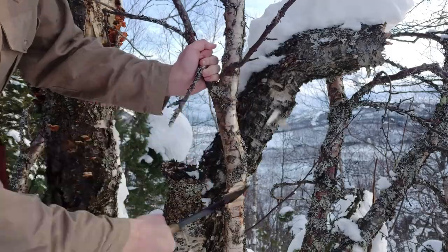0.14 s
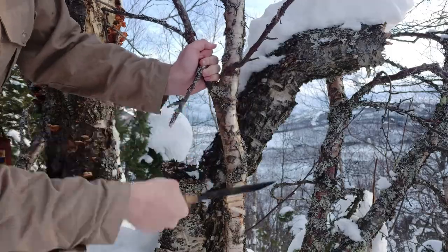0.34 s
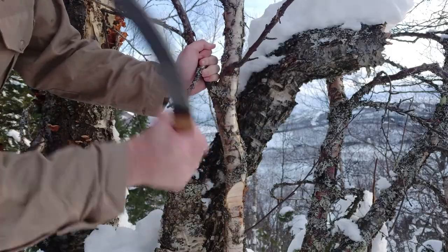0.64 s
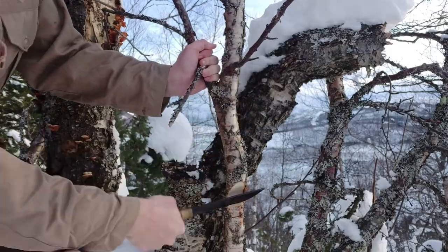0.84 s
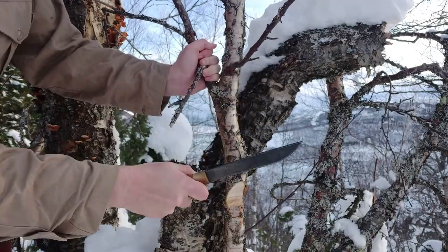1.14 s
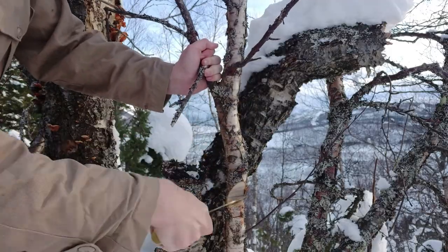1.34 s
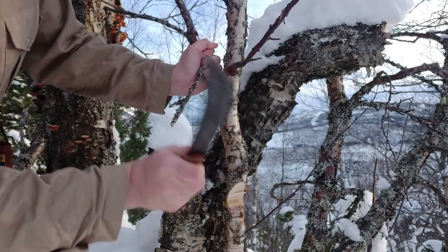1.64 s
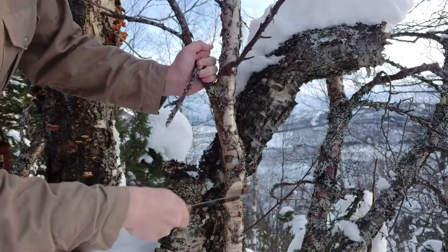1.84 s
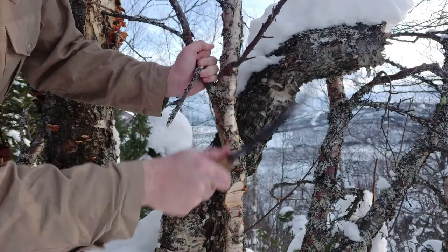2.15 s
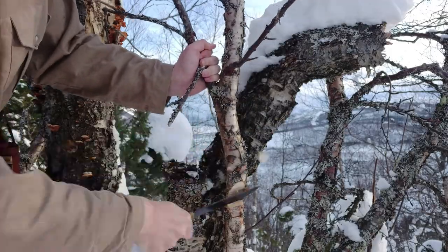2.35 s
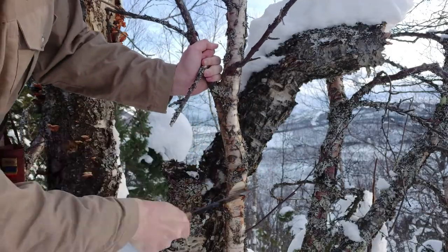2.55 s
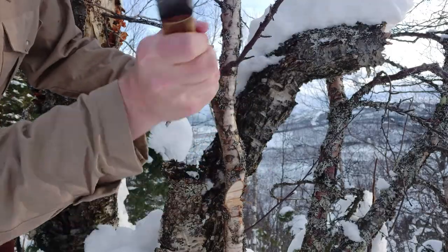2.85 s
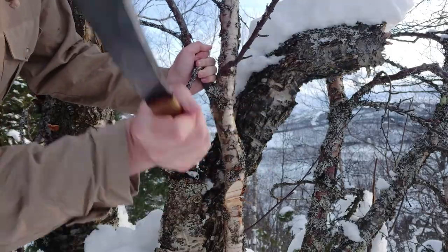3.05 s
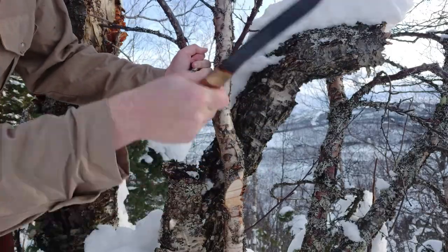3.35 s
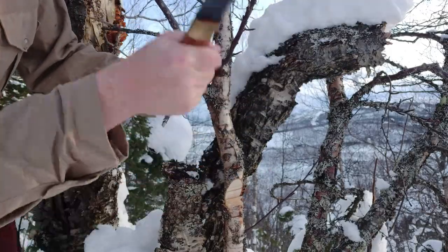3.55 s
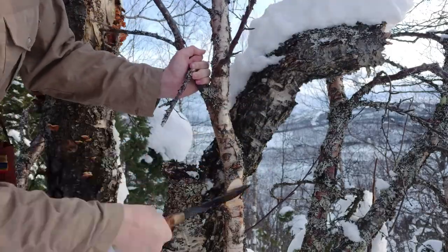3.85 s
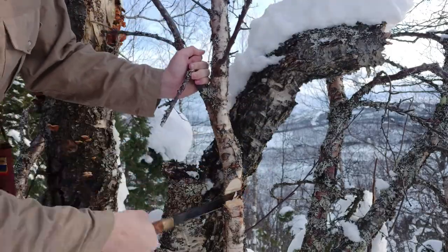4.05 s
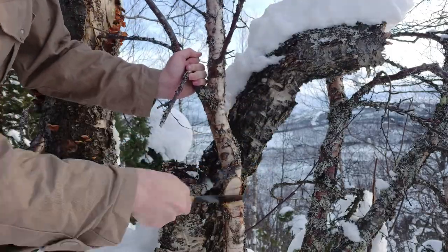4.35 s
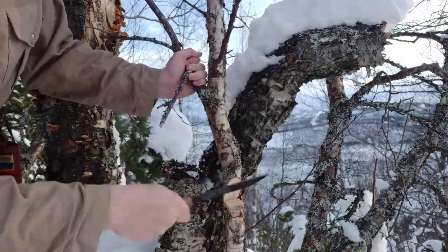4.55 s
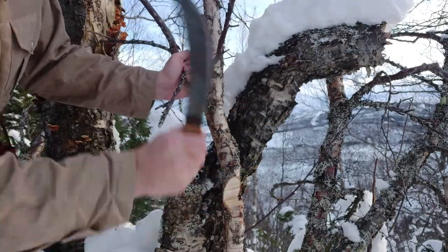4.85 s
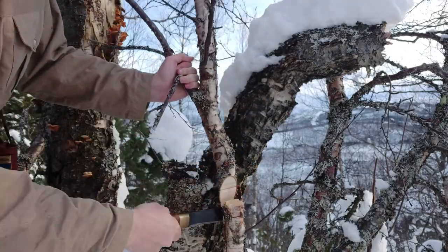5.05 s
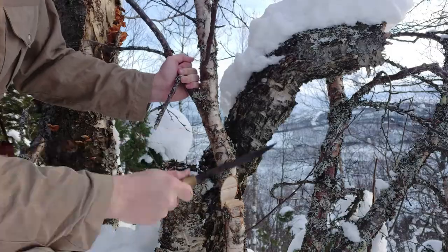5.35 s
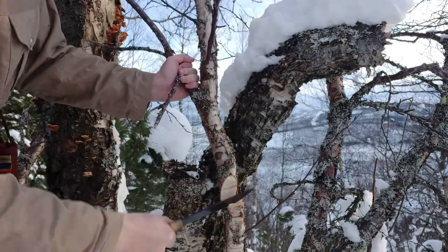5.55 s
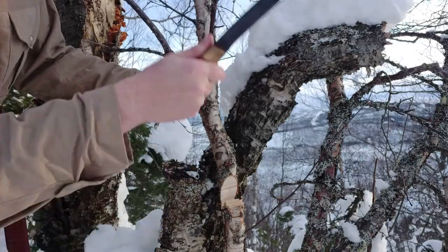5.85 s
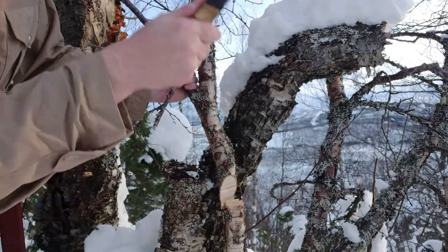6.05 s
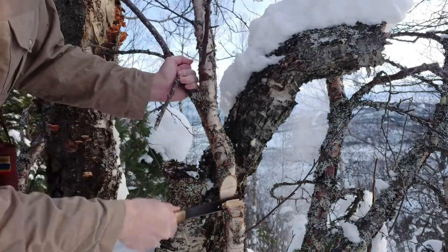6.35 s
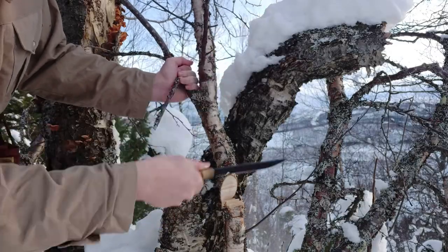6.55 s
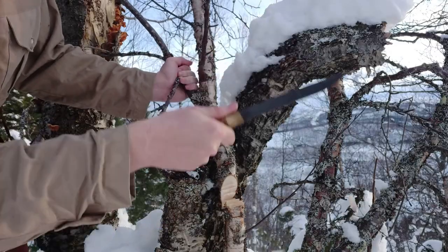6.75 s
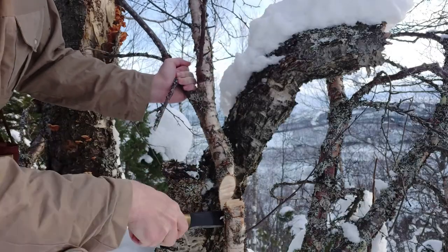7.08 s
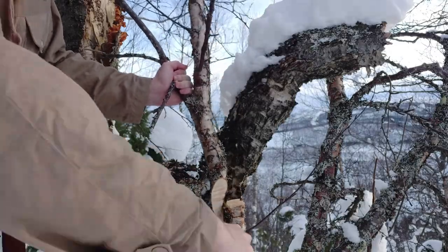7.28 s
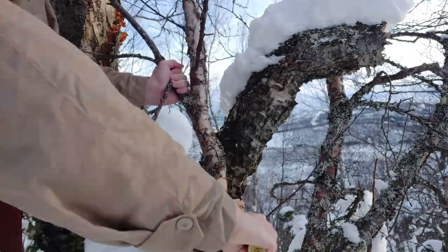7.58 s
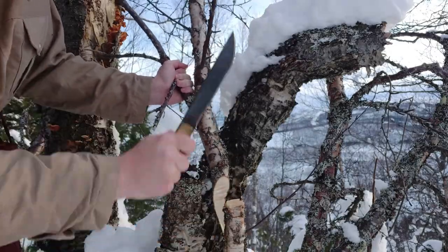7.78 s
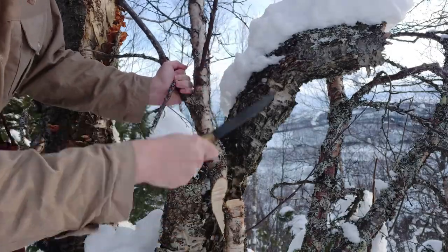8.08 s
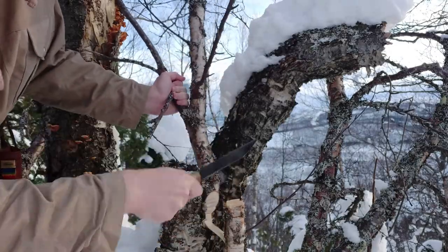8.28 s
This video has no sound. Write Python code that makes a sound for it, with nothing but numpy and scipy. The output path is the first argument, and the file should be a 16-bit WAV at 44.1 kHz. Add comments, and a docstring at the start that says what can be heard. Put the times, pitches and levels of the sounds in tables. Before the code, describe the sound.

Fast, uneven chopping of a slender tree by a large blade, recorded close in stereo outdoors. Sharp splintery snaps and woody knocks vary in brightness and weight, with occasional puffs of air bumping the microphone and faint jacket-sleeve swishes. After a hard bright blow the chopping stops for about a second while small crackles and gritty tugs free the blade; three final blows follow. Soft low air and a quickly swallowed echo from the trees.

```python
"""Snowy wood: a big knife chops a thin birch stem near the microphone, in runs of about six blows a second.
Each blow sums a noise crack of cut fibres, a modal knock and a modal thump of the stem; splinters snap off.
Trees return a short echo of diffuse noise; a jacket sleeve swishes as shaped noise; quiet air lies below.
One blow glances with a steel ping; late on, tugs on the stuck blade scrape as stick-slip noise."""
import sys
import numpy as np
from scipy import signal
from scipy.fft import rfft, irfft, next_fast_len
from scipy.io import wavfile

SR = 44100
rng = np.random.default_rng(int(sys.argv[2]) if len(sys.argv) > 2 else 0)


def to_wav(sig):
    """Store sig (one row per channel, or 1-D mono) as 16-bit WAV at the path in sys.argv[1].

    Samples outside -1..1 are clipped; the rate is SR.
    """
    pcm = np.clip(np.atleast_2d(sig), -1, 1) * 32767
    pcm = np.round(pcm).astype(np.int16)
    wavfile.write(sys.argv[1], SR, pcm.T)  # frames by channels


N = 371322
TIME_S = np.arange(N) / SR
BLOW_S = np.arange(SR // 8) / SR   # time within one blow

# Blows: (time [s], crack level [dB], bite scale [ms], brightness [dB/octave], chip pitch [Hz],
#         knock level before trim [dB], thump level before trim [dB])
CHOPS = [(.0046, -24.5, 1.1, -3, 14500, -32, -21.5), (0.1794, -20, 1.84, 5, 9370, -37, -26),
         (0.3531, -21.5, 0.71, -2.5, 6240, -29.5, -24), (.526, -24, 1.7, 2.5, 12700, -33.5, -23.5),
         (0.6946, -27, 2.1, -7.5, 10600, -31, -22.5), (0.8652, -23, 0.23, -3, 11200, -32, -22.5),
         (1.0258, -17.5, 0.38, -5.5, 14100, -26.5, -14), (1.3113, -44, 1.9, -9, 5360, -48.5, -41),
         (1.549, -16.5, 1.3, -1, 11550, -25, -20.5), (1.7054, -18.5, 0.94, -2.5, 4470, -25, -24.5),
         (1.8705, -21.5, 2, 1.5, 4570, -24.5, -26), (2.0345, -23, 2, -4, 6000, -27, -22.5),
         (2.1958, -29.5, 1, 3.5, 14650, -39.5, -28), (2.383, -20.5, 1.35, 5.5, 7980, -34.5, -26.5),
         (2.568, -23.5, 0.47, 0, 13200, -33.5, -22.5), (2.751, -19.5, 1.66, -1.5, 11400, -25, -24),
         (2.9312, -20, .9, 4.5, 10700, -35.5, -23.5), (3.107, -22, 0.65, 0, 10170, -30, -19.5),
         (3.2937, -22.5, 1.1, -5.5, 11070, -24, -23), (3.4779, -19.5, 0.45, -6, 7020, -34.5, -20.5),
         (3.6714, -15.5, 1.73, 2, 5420, -28, -17), (3.877, -16, 2.9, -1.5, 5680, -19, -15.5),
         (4.081, -15, 3.1, 1.5, 8860, -31.5, -27.5), (4.3757, -46.5, 1.7, -8, 3530, -42, -34),
         (4.5444, -20.5, 1.9, 5.5, 11200, -37.5, -25), (4.7296, -25.5, 0.99, -1.5, 3500, -37.5, -24),
         (4.9054, -15, 3.9, 0, 11130, -35, -27.5), (5.5895, -19, 1.5, -6, 5020, -24.5, -18),
         (5.7767, -18, 1.64, -3.5, 5300, -21.5, -17), (5.966, -26.5, 2, 4, 10000, -45, -31),
         (6.1728, -17.5, 0.38, 6.5, 13960, -34.5, -21), (6.3616, -18, 4.1, -2, 7120, -31, -24.5),
         (6.5424, -18.5, 1.5, 1.5, 14000, -32.5, -21.5), (6.7128, -21, 1.67, 2.8, 7680, -29.5, -19.5),
         (6.8928, -11, 3.4, 0, 6220, -25.5, -25), (7.8533, -19, 0.28, 0.5, 10630, -25.5, -18.5),
         (8.0408, -17, 0.24, 12, 10150, -35, -32), (8.2139, -26, 0.89, -5, 14500, -32.5, -33.5)]
# Splinters snapping off: (time [s], level [dB], bite scale [ms])
SPLINTERS = [(1.0328, -35, 0.75), (1.5443, -29, .8), (3.6186, -51.5, 2.8), (3.8855, -20.5, 2.4),
             (4.222, -56.5, 1.4), (5.1769, -54, 1.9), (5.83, -51.5, 1.4), (6.365, -27.5, 1.5),
             (7.2142, -37.5, 2.9), (7.228, -42, 4.7), (7.441, -48.5, 2.2), (7.4868, -41, 4.9),
             (7.5368, -40.5, 3.1), (7.5762, -47.5, 3), (7.802, -57, 0.49), (8.222, -30, 3.1),
             (8.2762, -45.5, 4.4)]
# Soft nudges of the stem: (time [s], level [dB])
NUDGES = [(1.407, -52), (5.176, -49), (7.375, -44), (7.443, -50), (7.577, -41), (7.687, -44.5)]
# Swings fanning air onto the microphone: (time [s], level [dB], left over right [dB])
PUFFS = [(.0046, -29.5, 12), (0.18, -32.5, -13), (0.6931, -21.5, 20), (2.1957, -31, 4),
         (3.107, -17.5, 33.5), (3.4772, -21, 23), (4.0803, -30.5, 23.5), (6.5428, -28, 15),
         (6.713, -13, 18.5)]
# Stem bending modes: (frequency [Hz], relative level [dB], t60 [s])
STEM_MODES = [(134, -22.5, 0.01), (240, -5, 0.076), (321.3, 3.5, 0.041), (361, 1.5, .03), (478, -9, 0.044),
              (526, -6, 0.038)]
# Hollow note of the blow: (frequency [Hz], relative level [dB], t60 [s])
HOLLOW_MODES = [(766, 2, .021)]
# Steel on hard wood: (frequency [Hz], relative level [dB], t60 [s])
KNOCK_MODES = [(1237, -9, 0.027), (1480, -14.5, 0.031), (1774, 4, 0.011), (1970, -2, 0.0095),
               (2130, -2.5, 0.007)]
# Knock rising as the notch deepens: (time [s], pitch ratio [1])
NOTCH_PITCH = [(0, 1.007), (5.8, 1.034), (6.9, 1.1), (8.3, 1.21)]
# Larger arm movements: (peak time [s], level [dB], length between 1/e points [s])
REACHES = [(1.22, -61.5, .12), (1.346, -57, 0.19), (1.409, -49.5, 0.024), (4.195, -71.5, .2),
           (5.021, -64.5, .12), (5.154, -51, .05), (5.29, -69, .12), (6.056, -67.5, .08), (6.66, -56.5, .1),
           (6.79, -61.5, .06), (7.301, -64.5, 0.12), (7.691, -60, .1), (8.016, -46.5, .055),
           (8.328, -68, .14)]
# Tugs on the stuck blade: (peak time [s], level before trim [dB], length between 1/e points [s])
TUGS = [(7.245, -47.5, 0.055), (7.385, -55, .04), (7.442, -53, 0.011), (7.492, -44, 0.055),
        (7.578, -39.5, 0.051), (7.65, -58, 0.17), (8.24, -42, 0.042), (8.276, -52.5, 0.019),
        (8.35, -55.5, 0.15)]
# Low background: (time [s], level [dB])
BACKGROUND_LEVEL = [(0.0, -51), (0.3, -64), (1.5, -56.5), (1.97, -63), (3.94, -59.5), (4.22, -65.5),
                    (4.64, -63), (5.11, -65), (5.32, -60), (6.47, -59.5), (6.71, -58), (7.17, -62.5),
                    (7.57, -53.5), (7.92, -55.5), (8.25, -65), (8.42, -90)]
# Spectrum of cut fibres: (frequency [Hz], relative level [dB])
CRACK_SPECTRUM = [(300, -24), (900, -5), (1500, -10.5), (2200, -7.5), (2800, -3), (4000, -1), (5500, 1),
                  (8000, 0), (11000, 1.5), (14000, 2), (16000, -5)]
# Echo strength by band: (frequency [Hz], relative gain [dB])
ECHO_SPECTRUM = [(60, -13), (150, 3.5), (400, 4), (800, -3.5), (1800, -6.5), (3000, 2.5), (5000, 0.5),
                 (10000, -1), (16000, 0)]
# Spectrum of air and of flapping cloth: (frequency [Hz], relative level [dB])
AIR_SPECTRUM = [(30, -40), (64, -30), (100, -13), (230, -4.5), (380, -9.5), (620, -16.5), (670, -14.5),
                (695, -7.5), (725, -9.5), (765, -7.5), (850, -18), (1200, -25), (2600, -35.5), (16000, -37)]
# Spectrum of swishing cloth: (frequency [Hz], relative level [dB])
SLEEVE_SPECTRUM = [(60, -44), (500, -18.5), (1500, -13), (3000, -14), (6000, -10), (9400, -4.5), (11200, 3),
                   (12800, -5), (15500, -5)]
# Spectrum of the scraping blade: (frequency [Hz], relative level [dB])
SCRAPE_SPECTRUM = [(40, -24.5), (100, -8.5), (190, 11), (370, 9.5), (800, 0), (1300, -1.5), (3000, 4),
                   (5000, 2), (11000, 6), (16000, 4.5)]
# Left-right likeness of diffuse sound: (frequency [Hz], correlation [-1..1])
LIKENESS = [(60, 0.018), (290, .86), (640, 0.8), (1400, 0.19), (3000, 0.039), (15000, 0.052)]

STOP_S, STOP_SCATTER_S = 0.0039, 0.00022   # blade entry to dead stop
HOLLOW_DB, HOLLOW_KNOCK_SHARE = -1.9, 0.41   # follows the tabled thump, and by this share the knock
STIR_DB = -38   # air stirred by every blow, relative to the tabled thump
SPLINTER_HZ, SPLINTER_BRIGHT_DB_PER_OCTAVE = 11000, 4.5
SWING_LEAD_S, SWING_DB, SWING_LENGTH_S = 0.096, -75, 0.13   # swish peak ahead of each blow
GLANCE_S, PING_DB, PING_HZ = 1.3118, -37, 5500
CUTOFF_HZ = 16200


def from_db(db):
    """Decibels to amplitude ratio."""
    return 10 ** (np.asarray(db) / 20)


def at_hz(points, hz):
    """Read a spectrum on a log-frequency axis."""
    points_hz, values = np.transpose(points)
    return np.interp(np.log(hz + 1), np.log(points_hz), values)


def coloured(x, spectrum):
    """Causal (minimum-phase) filter with the given spectrum."""
    length = x.shape[-1]
    size = next_fast_len(length + SR // 20, True) // 2 * 2
    gain = from_db(at_hz(spectrum, np.fft.rfftfreq(size, 1 / SR)))
    # folding the cepstrum onto positive times gives minimum phase
    cepstrum = irfft(np.log(gain))
    cepstrum[1:size // 2] *= 2
    cepstrum[size // 2 + 1:] = 0
    return irfft(rfft(x, size) * np.exp(rfft(cepstrum)))[..., :length]


def at_level(x, db):
    """Scale a short sound so that its energy, spread over 10 ms, has this level."""
    energy = np.mean(np.sum(x ** 2, -1))
    return x * from_db(db) / np.sqrt(energy * 100 / SR + 1e-20)


def panned(x, pan_db):
    """Set left over right by this many dB, half on each side."""
    return x * from_db(np.array([[pan_db], [-pan_db]]) / 2)


def add(out, time_s, x):
    """Mix a short stereo sound in at this time."""
    i = max(round(time_s * SR), 0)
    out[:, i:i + x.shape[-1]] += x[:, :N - i]


def wander(step_s):
    """A random value every step, joined by straight lines."""
    values = rng.standard_normal(N // 8)
    return np.interp(TIME_S / step_s, np.arange(len(values)), values)


def swells(rows):
    """Gain of movements that each swell to a peak and fade."""
    gain = np.zeros(N)
    for peak_s, db, length_s in rows:
        near = np.abs(TIME_S - peak_s) < 2 * length_s
        gain[near] += from_db(db) * np.exp(-(2 * (TIME_S[near] - peak_s) / length_s) ** 2)
    return gain


def noise(spectrum, grain_db, grain_s):
    """Stereo noise of rms 1, its level wandering from grain to grain before colouring."""
    size = next_fast_len(N, True)
    alike = np.clip(at_hz(LIKENESS, np.fft.rfftfreq(size, 1 / SR)), -1, 1)
    white = rfft(rng.standard_normal((2, size)))
    mid, side = irfft(white * np.sqrt([1 + alike, 1 - alike]), size)[:, :N]
    grains = from_db(grain_db * wander(grain_s))
    x = coloured(np.array([mid + side, mid - side]) * grains, spectrum)
    return x / x.std()


def quiet_air():
    """Low noise of the wood's air, following the background level."""
    level_db = np.interp(TIME_S, *np.transpose(BACKGROUND_LEVEL))
    return from_db(level_db) * noise(AIR_SPECTRUM, grain_db=-1.0, grain_s=0.13)


def sleeve(flap_db=-2, zip_db=-8, zip_hz=11200, glide_hz=350, jitter_hz=330):
    """Cloth swishes and flaps dully with every downswing and reach; the ribs of its weave add a thin zip."""
    swings = [(chop[0] - SWING_LEAD_S, SWING_DB, SWING_LENGTH_S) for chop in CHOPS]
    motion = swells(swings + list(REACHES))
    swish = noise(SLEEVE_SPECTRUM, grain_db=3.5, grain_s=0.001)
    flap = from_db(flap_db) * noise(AIR_SPECTRUM, grain_db=3.5, grain_s=0.02)
    ribs_hz = zip_hz + glide_hz * wander(0.14) + jitter_hz * wander(0.0005)
    weave = from_db(zip_db) * wander(0.002) * np.sin(2 * np.pi * np.cumsum(ribs_hz) / SR)
    return motion * (swish + flap + weave)


def crack(db, bite_ms, bright_db_per_octave, pitch_hz, ring_db=-14, ring_s=0.0022, peak_db=6,
          chip_width_hz=800, rise_s=0.00011, fibre_db=4.0, apart=0.56, lead_s=0.000025):
    """Fibres part in a dense burst while the edge bites; the chip rings briefly at its own pitch."""
    count = len(BLOW_S)
    bite = np.exp(-(BLOW_S * 1000 / (1.3 * bite_ms)) ** 2)
    ring = from_db(ring_db) * np.exp(-BLOW_S / ring_s)
    envelope = (1 - np.exp(-BLOW_S / rise_s)) * (bite + ring)
    # a new random fibre strength every 0.3 ms
    strength = np.interp(BLOW_S / 0.0003, np.arange(count), rng.standard_normal(count))
    common, own = rng.standard_normal(count), rng.standard_normal((2, count))
    burst = (common + apart * own) * envelope * from_db(fibre_db * strength)
    # the left port hears it a moment sooner
    lead_samples = lead_s * SR * rng.uniform(0.6, 1.4)
    delay = np.exp(-2j * np.pi * np.fft.rfftfreq(count) * lead_samples)
    burst[1] = irfft(rfft(burst[1]) * delay, count)
    burst[1, count // 2:] = 0   # drop wrap-around
    hz = np.geomspace(200, 18000, 120)
    tilt = bright_db_per_octave * np.clip(np.log2(hz / 7500), -0.6, 0.5)
    chip = peak_db * np.exp(-((hz - pitch_hz) / chip_width_hz) ** 2)
    spectrum = np.c_[hz, at_hz(CRACK_SPECTRUM, hz) + tilt + chip]
    return at_level(coloured(burst, spectrum), db)


def struck(modes, scatter_db, ratio=1, detune=0.015):
    """Decaying modes; each blow lands elsewhere and shifts their strength and pitch a little."""
    out = 0
    for hz, db, t60_s in modes:
        strength, shift = rng.standard_normal(2)
        pitch_hz = hz * ratio * (1 + detune * shift)
        decay = np.exp(-np.log(1000) * BLOW_S / t60_s)
        out = out + from_db(db + scatter_db * strength) * decay * np.sin(2 * np.pi * pitch_hz * BLOW_S)
    return out


def jolt(at_s, width_s):
    """A short push of unit area."""
    push = np.exp(-((BLOW_S - at_s) / width_s) ** 2)
    return push / push.sum()


def driven(force, ring):
    """A body's response to a force within one blow."""
    return signal.fftconvolve(force, ring)[:len(BLOW_S)]


def high_passed(x, order, cutoff_hz):
    """Remove bass that the source is too small to radiate."""
    return signal.sosfilt(signal.butter(order, cutoff_hz, "high", fs=SR, output="sos"), x)


def knock(db, hollow_db, stop_s, ratio, stop_db=-16, second_push=0.81):
    """The wood is jolted twice: as the edge enters and as the blade stops dead."""
    entry, stop = jolt(0.0002, 0.00008), jolt(stop_s, 0.00008)
    hard_ring = struck(KNOCK_MODES, scatter_db=5.0, ratio=ratio)
    wood = at_level(driven(entry + from_db(stop_db) * stop, hard_ring), db)
    hollow_ring = struck(HOLLOW_MODES, scatter_db=0)
    hollow = at_level(driven(entry + second_push * stop, hollow_ring), hollow_db)
    both = high_passed(wood + hollow, 2, 380)
    return panned(np.array([both, np.roll(both, 2)]), pan_db=2.5)   # slightly later on the right


def thump(db, stop_s, width_s=0.000047, side_db=-8, low_cut_hz=135):
    """The force on the stem grows as the blade sinks in, then lets go, and the stem swings back."""
    sinking = BLOW_S * (BLOW_S < stop_s)
    force = jolt(stop_s, width_s) - sinking / sinking.sum()
    swing = driven(force, struck(STEM_MODES, scatter_db=2.2))
    # early sideways whip, opposite at the two ports
    sideways = driven(jolt(0.001, width_s), struck(STEM_MODES, scatter_db=4)) * np.exp(-BLOW_S / 0.004)
    swing = swing + from_db(side_db) * sideways * rng.choice([-1, 1]) * np.array([[1], [-1]])
    return at_level(high_passed(swing, 4, low_cut_hz), db)


def puff(db, pan_db, swing_hz=155, fade_s=0.0036, low_cut_hz=110):
    """Air pushed by the blade hits the microphone ports as a quickly dying swing."""
    swing = np.sqrt(BLOW_S) * np.exp(-BLOW_S / fade_s) * np.sin(2 * np.pi * swing_hz * BLOW_S)
    return at_level(panned(-high_passed(swing, 1, low_cut_hz), pan_db), db)


def chopping(knock_trim_db=2, thump_trim_db=0.5, thump_pan_db=0.4):
    """Every blow, splinter, nudge and puff of air."""
    out = np.zeros((2, N))
    stops_s = STOP_S + STOP_SCATTER_S * rng.standard_normal(len(CHOPS))
    for chop, stop_s in zip(CHOPS, stops_s):
        time_s, crack_db, bite_ms, bright, chip_hz, knock_db, thump_db = chop
        hollow_db = HOLLOW_DB + thump_db + HOLLOW_KNOCK_SHARE * (knock_db - thump_db)
        ratio = np.interp(time_s, *np.transpose(NOTCH_PITCH))
        add(out, time_s, crack(crack_db, bite_ms, bright, chip_hz))
        add(out, time_s, knock(knock_db + knock_trim_db, hollow_db, stop_s, ratio))
        add(out, time_s, panned(thump(thump_db + thump_trim_db, stop_s), thump_pan_db))
        add(out, time_s, puff(thump_db + STIR_DB, 0, swing_hz=59, low_cut_hz=20))
    for time_s, db, bite_ms in SPLINTERS:
        add(out, time_s, crack(db, bite_ms, SPLINTER_BRIGHT_DB_PER_OCTAVE, SPLINTER_HZ))
    for time_s, db in NUDGES:
        add(out, time_s, thump(db, STOP_S))
    for time_s, db, pan_db in PUFFS:
        add(out, time_s, puff(db, pan_db))
    return out


def trees(x, echo_db=-23, build_s=0.0091, t60_s=0.13, far_db=-31, far_t60_s=0.35,
          grain_db=3.0, grain_s=0.0025):
    """Trunks and branches scatter each band's energy into a diffuse echo, which the snow soon swallows."""
    t = np.arange(SR // 3) / SR
    near = np.exp(-np.log(1000) * t / t60_s)
    far = from_db(far_db) * np.exp(-np.log(1000) * t / far_t60_s)
    arrivals = ((1 - np.exp(-(t / build_s) ** 2)) * (near + far)) ** 2
    edges_hz = [135, 240, 440, 900, 1500, 2600, 4500, 7500, 11000, 17000]
    out = 0
    for low_hz, high_hz in zip(edges_hz, edges_hz[1:]):
        band = signal.butter(3, [low_hz, high_hz], "band", fs=SR, output="sos")
        power = np.mean(signal.sosfilt(band, x + 1e-18) ** 2, axis=0)
        power = np.abs(signal.oaconvolve(power, arrivals / arrivals.sum())[:N])
        centre_hz = np.sqrt(low_hz * high_hz)
        alike = np.clip(at_hz(LIKENESS, centre_hz), 0, 1)
        shared, own = rng.standard_normal(N), rng.standard_normal((2, N))
        wash = signal.sosfilt(band, np.sqrt(alike) * shared + np.sqrt(1 - alike) * own)
        out = out + from_db(at_hz(ECHO_SPECTRUM, centre_hz)) * np.sqrt(power) * wash / wash.std()
    trunks = wander(grain_s)   # single trunks stand out
    return from_db(echo_db + grain_db * trunks) * out


def glance(pan_db=7, fade_s=0.00098):
    """The blade glances off the bark and the steel pings: one short decaying sine."""
    out = np.zeros((2, N))
    ping = BLOW_S * np.exp(-BLOW_S / fade_s) * np.sin(2 * np.pi * PING_HZ * BLOW_S)
    add(out, GLANCE_S, at_level(panned(ping, pan_db), PING_DB))
    return out


def prying(trim_db=-1, slip_db=4.0, slip_s=0.01):
    """With each tug the blade sticks and slips; within each slip single fibres crackle."""
    fibres = noise(SCRAPE_SPECTRUM, grain_db=4.0, grain_s=0.0017)
    return from_db(trim_db + slip_db * wander(slip_s)) * swells(TUGS) * fibres


def scene():
    """Knife sounds and their echo over the sleeve and the quiet air of the wood."""
    air = quiet_air()
    knife = chopping() + glance() + prying()
    return knife + trees(knife) + sleeve() + air


def record(dry):
    """Peaks beyond full scale overload flat; a steep low-pass cuts the top."""
    low_pass = signal.ellip(8, 0.3, 70, CUTOFF_HZ, fs=SR, output="sos")
    return signal.sosfilt(low_pass, np.clip(dry, -1, 1))


dry = scene()
out = record(dry)
to_wav(out)
```